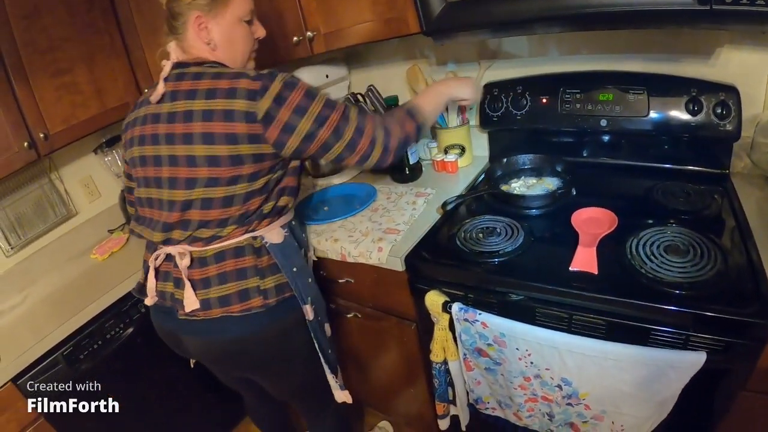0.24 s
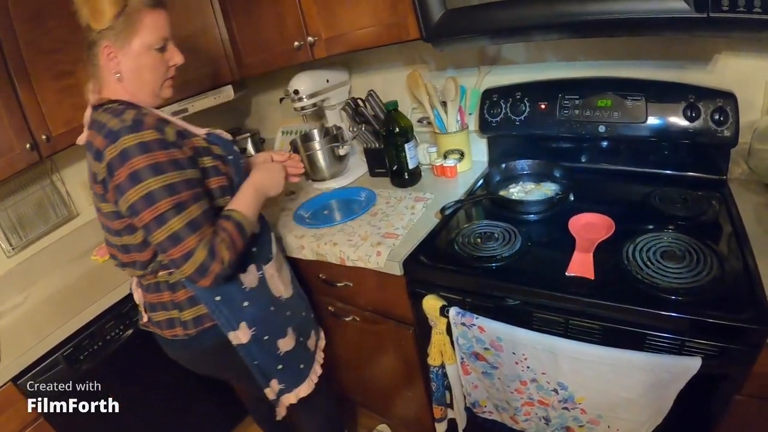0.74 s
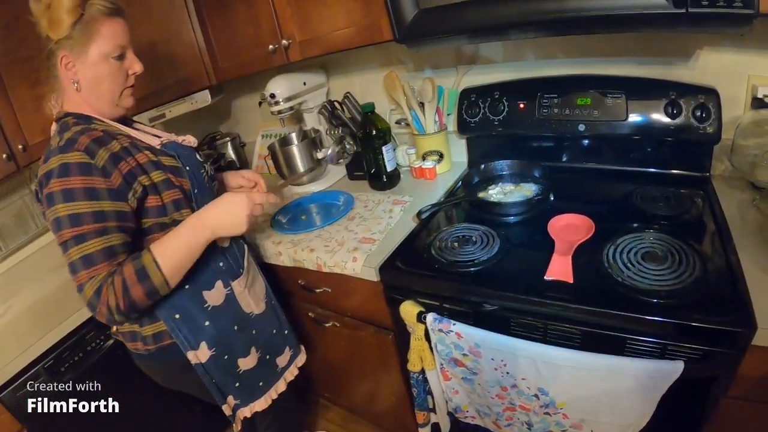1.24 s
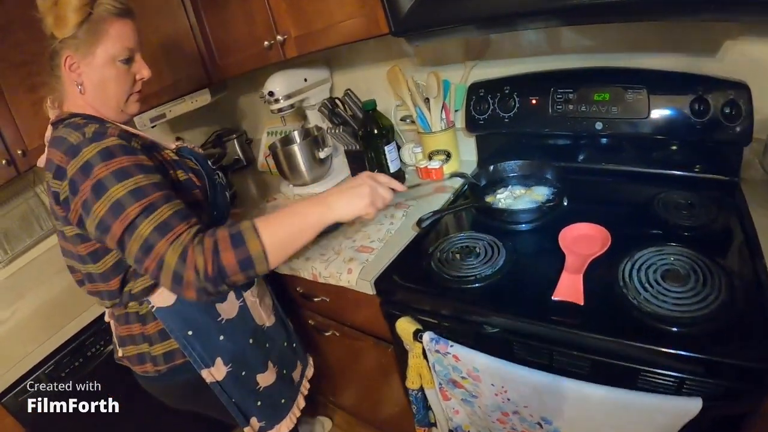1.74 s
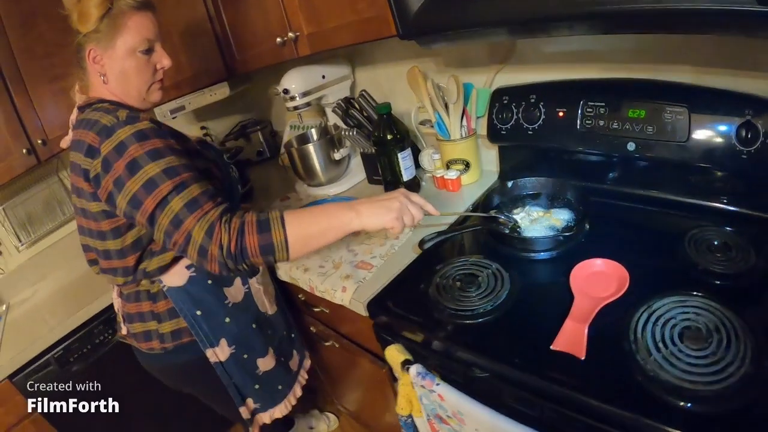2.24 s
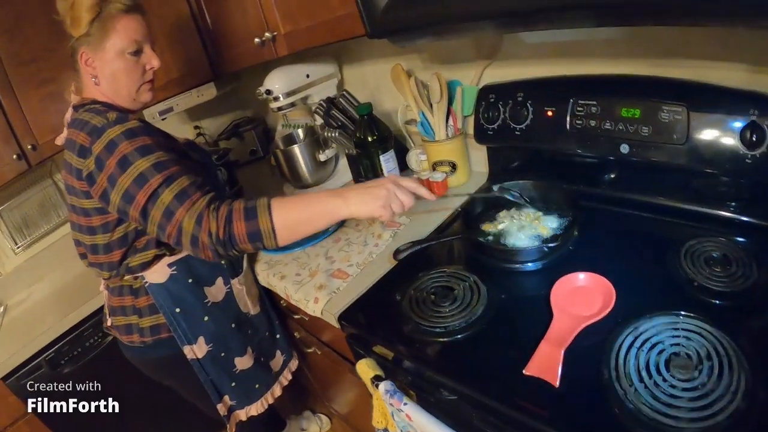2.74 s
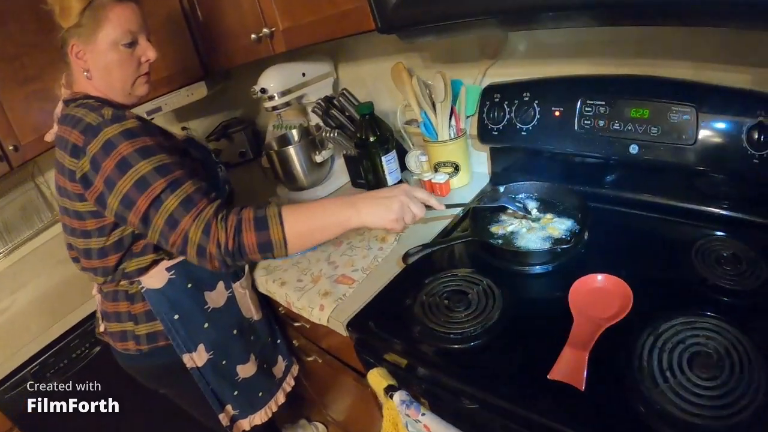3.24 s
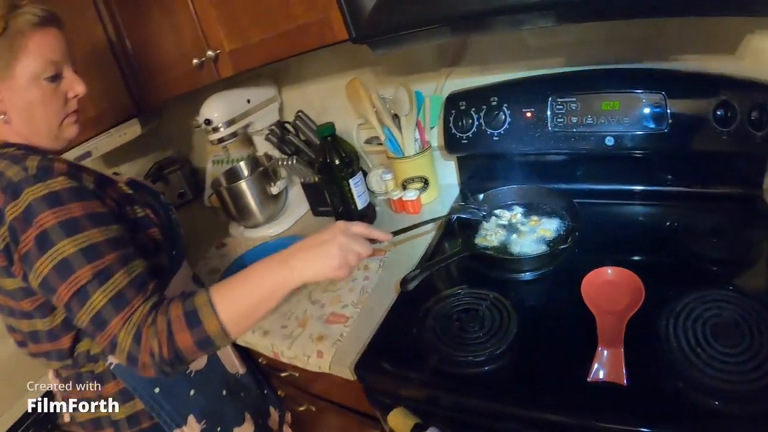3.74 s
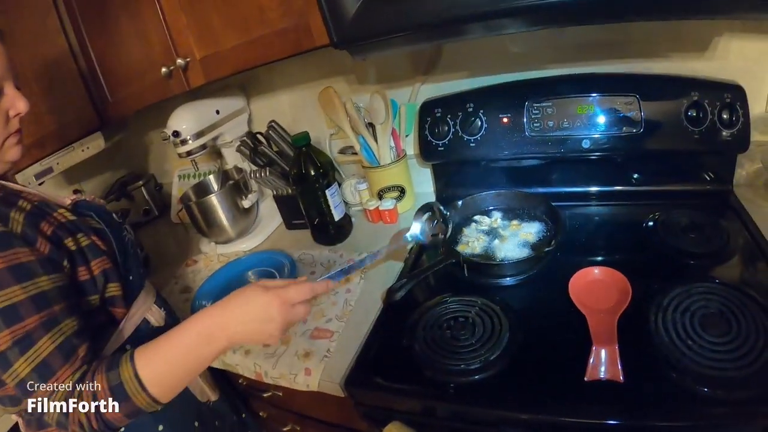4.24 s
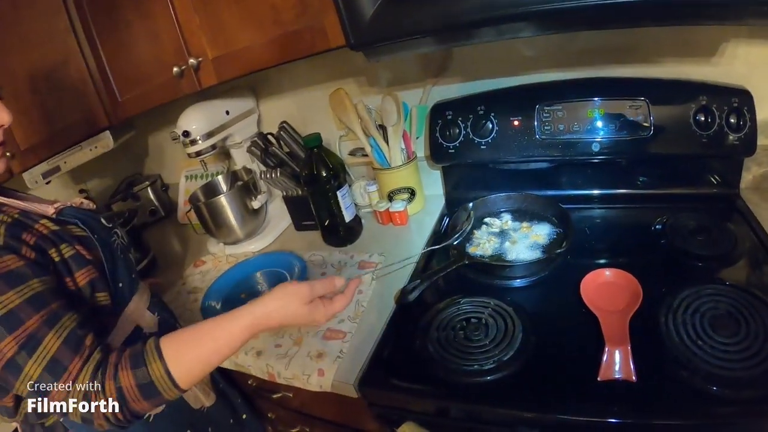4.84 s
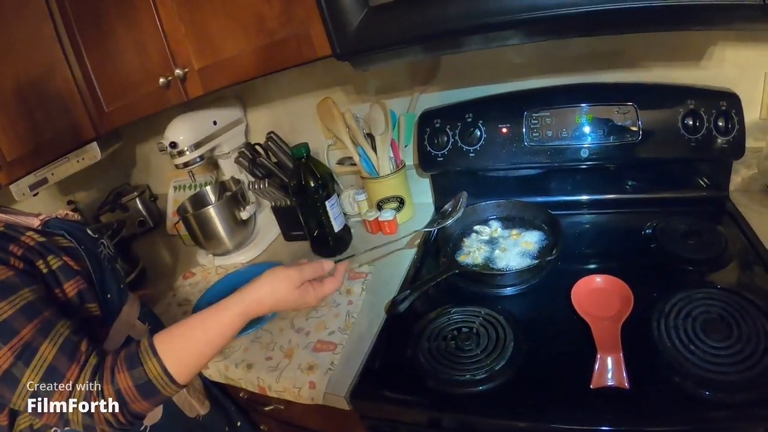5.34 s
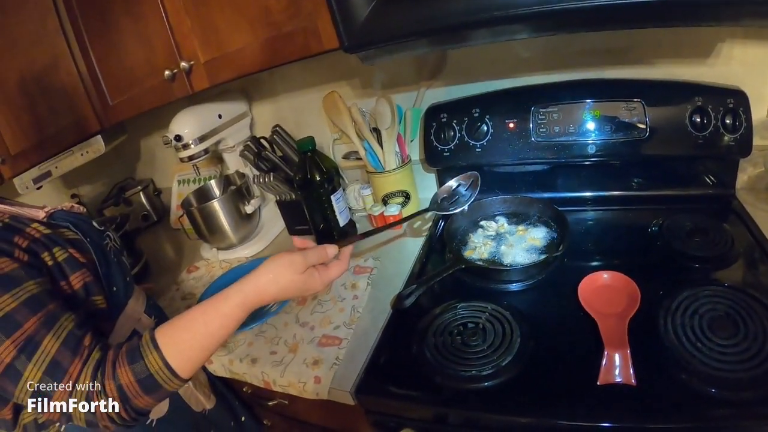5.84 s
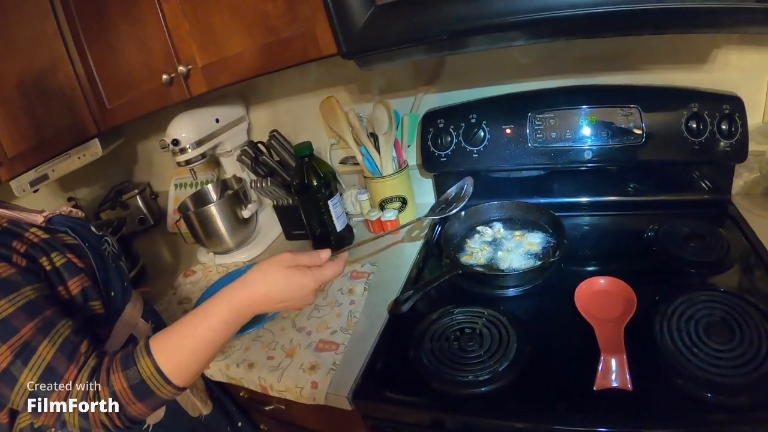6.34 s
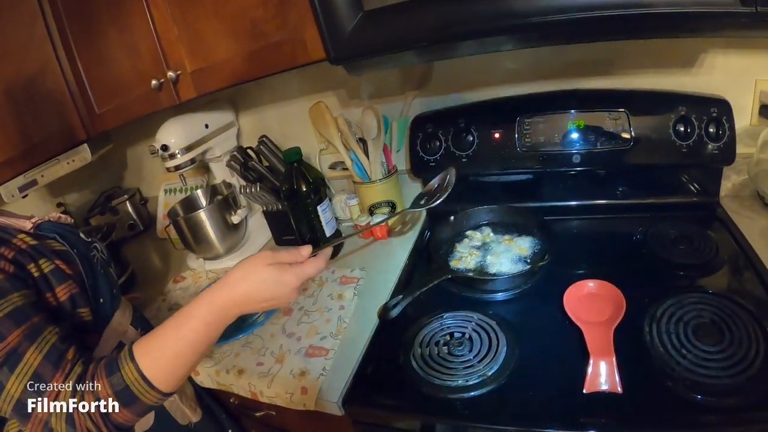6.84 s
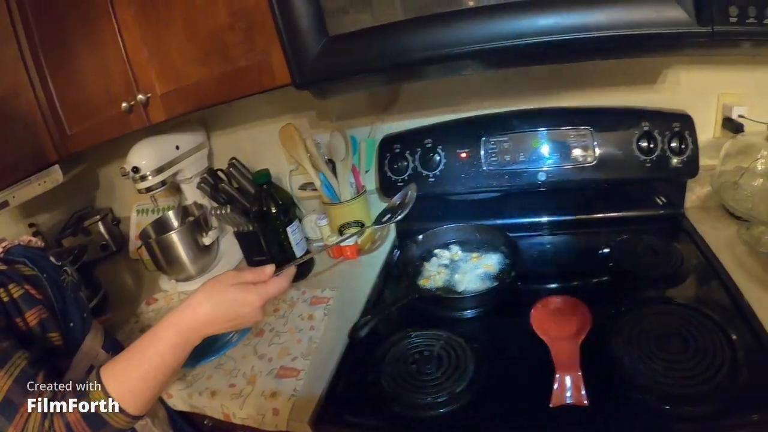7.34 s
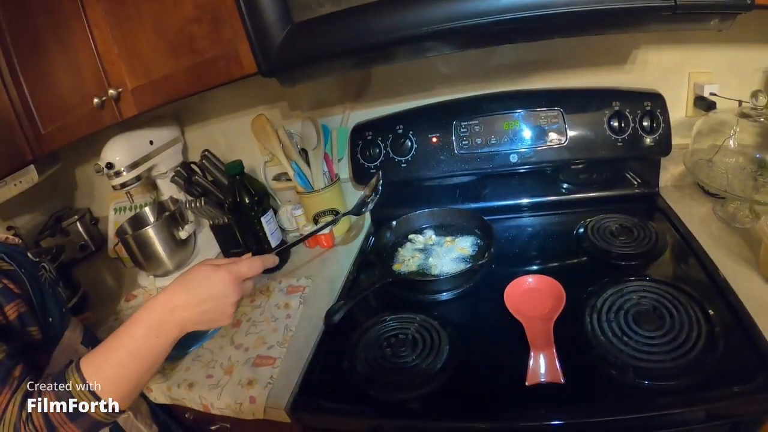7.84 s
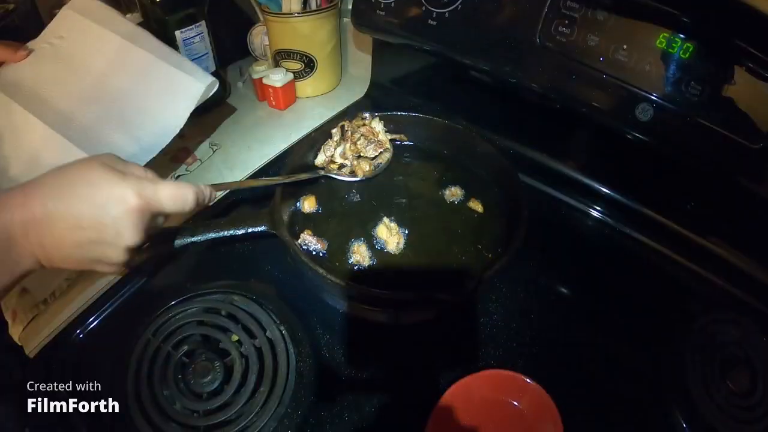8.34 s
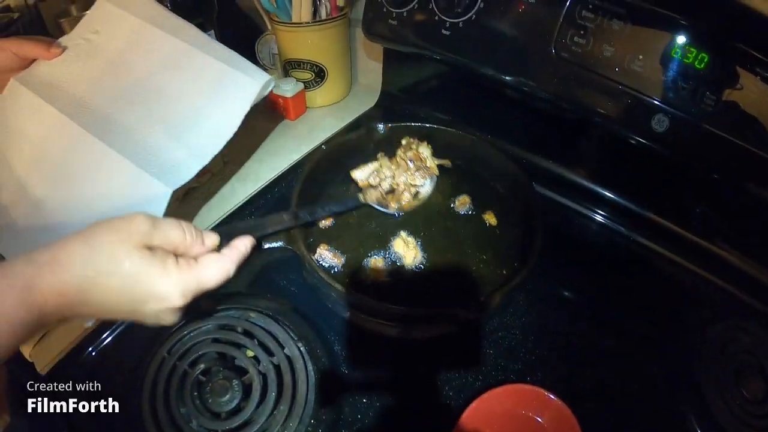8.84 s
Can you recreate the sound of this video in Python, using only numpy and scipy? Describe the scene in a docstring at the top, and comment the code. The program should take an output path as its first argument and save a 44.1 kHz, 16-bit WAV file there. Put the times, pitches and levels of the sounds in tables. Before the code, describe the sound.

Lively frying in a skillet, popping oil and utensil clacks, a deep bump, a sudden gap, then faint spoon scraping and ticks up close.

```python
"""Water boils out of meat in hot oil: filtered bubble grains sizzle, and big bubbles pop as damped sines with noise.
Utensils clack on the counter and near the pan as band-passed clicks and noise; a steel spoon also knocks and
scrapes, ringing the modes of the skillet. Low rumbling bumps follow, and the stereo sound breaks off for a moment.
Then, close up and in mono, the spoon drags, judders and ticks on the droning pan, from stick-slip grains
and short modes, while the oil only whispers in filtered noise."""
import sys
import numpy as np
from scipy import signal
from scipy.fft import rfft, irfft, next_fast_len
from scipy.io import wavfile
from scipy.ndimage import map_coordinates

SR = 44100
rng = np.random.default_rng(int(sys.argv[2]) if len(sys.argv) > 2 else 0)


def unload_wav(signal):
    """Save mono or channel-first audio to the path in sys.argv[1] as 16-bit WAV at rate SR, clipped to [-1, 1]."""
    wavfile.write(
        sys.argv[1],
        SR,
        np.round(np.clip(np.atleast_2d(signal).T, -1, 1) * 32767).astype(np.int16),
    )


N = 400869
BREAK_S, RESUME_S = 8.228, 8.46  # the frying breaks off; the close-up begins

# Spectral density of bursting bubbles: f/Hz, relative level/dB per Hz
CRACKLE_SPECTRUM = [(35, -35.5), (60, -49), (152, -13.5), (286, -12.5), (361, -8), (406, -20.5),
                    (478, -11.5), (837, -8.5), (1130, -6.5), (1370, -5), (3020, -3.5), (7150, -8.5),
                    (8620, -12), (12800, -22), (15800, -50.5)]
# Spectral density of fine spray: f/Hz, relative level/dB per Hz
FIZZ_SPECTRUM = [(3000, -10.5), (6000, -17.5), (8700, 9), (10000, -6), (12700, -3.5), (15800, -15.5)]


def amp(db):
    """Decibel law: level in dB to amplitude ratio."""
    return 10 ** (np.asarray(db) / 20)


def unit(x):
    """Normalization by mean power: scale to rms 1."""
    return x / np.sqrt(np.mean(x ** 2) + 1e-20)


def along(points, hz):
    """Logarithmic frequency scale: interpolate (f/Hz, value) points."""
    f, v = np.transpose(points)
    return np.interp(np.log(hz + 1), np.log(f + 1), v)


def curves(rows):
    """Linear interpolation in time: one value per sample for each column after t/s."""
    s, *columns = np.transpose(rows)
    return [np.interp(np.arange(N) / SR, s, column) for column in columns]


def between(start, end, fade):
    """Gating with linear ramps: 1 from start to end, all in s."""
    t = np.arange(N) / SR
    return np.clip(np.minimum(t - start, end - t) / fade + 0.5, 0, 1)


def wobble(rate):
    """Slow random modulation: a smooth curve through rate random knots a second."""
    knots = rng.standard_normal(int(N * rate / SR) + 4)
    return map_coordinates(knots, [np.arange(N) * rate / SR])


def filtered(x, response):
    """Linear filtering: multiply the spectrum by a complex response of frequency."""
    m = next_fast_len(N + SR // 2)
    return irfft(rfft(x, m) * response(np.fft.rfftfreq(m, 1 / SR)), m)[..., :N]


def coloured(x, gain_db):
    """Minimum-phase filtering: a causal response from a gain in dB, by folding the cepstrum."""
    size = 4096
    cepstrum = irfft(np.log(amp(gain_db(np.fft.rfftfreq(size, 1 / SR))) + 1e-6))
    fold = np.r_[1, np.full(size // 2 - 1, 2), 1, np.zeros(size // 2 - 1)]
    response = irfft(np.exp(rfft(cepstrum * fold)))
    return signal.oaconvolve(x, np.array(response, ndmin=x.ndim), axes=-1)[..., :N]


def shaped(x, spectrum):
    """Spectral shaping: filter by the given spectrum, then scale to rms 1."""
    return unit(coloured(x, lambda hz: along(spectrum, hz)))


def add(track, s, sound):
    """Superposition: mix a sound into a track at s seconds."""
    part = track[round(s * SR):][:len(sound)]
    part += sound[:len(part)]


def flare(attack, hold, release):
    t = np.arange(SR // 4) / SR
    return np.clip(t / attack, 0, 1) * np.exp(-np.maximum(t - hold, 0) / release)


def ringing(hz, t, rough):
    """Phase diffusion: a sine whose phase drifts, as in a mode damped by a loose contact."""
    return np.sin(2 * np.pi * hz * t + rough * np.cumsum(rng.standard_normal(len(t))))


def bubbles(count, low_hz, high_hz, cycles, spread_db):
    """Granular shot noise: short sines swell and die at random moments, many faint and a few strong."""
    when, pitch, size, life = rng.random((count, 4)).T[:, :, None]
    hz = low_hz * (min(high_hz, SR / 2) / low_hz) ** pitch
    k = np.arange(128)  # sample number within a grain
    turns = cycles * 3 ** (2 * life - 1)
    strength = amp(-spread_db * np.log(size + 0.057)) * hz / np.sqrt(turns)
    age = 2 * hz / SR / turns * k
    grains = strength * age * np.exp(-age) * np.sin(2 * np.pi * hz / SR * k)
    places = (when * N).astype(int) + k
    return unit(np.bincount(places.ravel(), grains.ravel(), minlength=N)[:N])


def sputtering():
    """Flash boiling: power of flare-ups, which hold while the juice lasts, and of short spits."""
    # Juice runs into the oil and the boil flares up: t/s, hold/s, relative level/dB
    sputters = [(0.616, 0.062, -29), (0.705, 0.14, -32.5), (1.593, 0.08, -32), (1.725, 0.049, -31),
                (2.395, 0.05, -32.5), (2.668, 0.079, -28.5), (3.488, 0.16, -34.5), (5.478, 0.043, -29),
                (6.044, 0.053, -30), (6.583, 0.048, -29.5), (6.658, 0.089, -31), (7.265, 0.12, -31.5),
                (7.761, 0.03, -26), (8.123, 0.022, -24.5)]
    # Single drops of juice flash to steam: t/s, relative level/dB
    spits = [(0.217, -30), (0.243, -27.5), (0.284, -25), (0.305, -25), (0.537, -27.5), (1.257, -28),
             (1.372, -27), (1.748, -27.5), (2.204, -23), (2.295, -25.5), (2.333, -26), (2.406, -24),
             (2.478, -25), (2.611, -22.5), (2.999, -26), (3.187, -25), (3.321, -24), (3.381, -25.5),
             (3.55, -23), (3.625, -25), (3.865, -25), (4.023, -25.5), (4.045, -26.5), (4.101, -22.5),
             (4.169, -25.5), (4.187, -25.5), (4.212, -23.5), (4.286, -21), (4.453, -26.5), (4.477, -26),
             (4.544, -27), (4.631, -25), (5.003, -24), (5.193, -25.5), (5.24, -25), (5.301, -23.5),
             (5.436, -25.5), (5.509, -28), (5.533, -23), (5.567, -29), (5.875, -25), (5.924, -22.5),
             (6.022, -26), (6.085, -25), (6.269, -23), (6.339, -23.5), (6.397, -27), (6.527, -21.5),
             (6.736, -24), (6.815, -23), (6.86, -27.5), (6.888, -25), (6.971, -25), (6.991, -26),
             (7.096, -25.5), (7.161, -26.5), (7.249, -24.5), (7.292, -25), (7.352, -23), (7.403, -24.5),
             (7.491, -23), (7.888, -23.5), (7.917, -23.5), (8.167, -27.5)]
    power = np.zeros(N)
    for s, hold, db in sputters:
        add(power, s, (amp(db) * flare(attack=0.0048, hold=hold, release=0.0059)) ** 2)
    for s, db in spits:
        add(power, s, (amp(db) * flare(attack=0.0015, hold=0.0073, release=0.004)) ** 2)
    return power


def sizzle():
    """Vapour-bubble noise: water boils out of the meat in flurries, and spray fizzes on the hot iron."""
    # How hard the oil boils: t/s, relative level/dB
    boil = [(0.0, -31), (0.76, -34), (0.93, -36), (1.2, -35), (1.7, -33.5), (1.9, -35), (2.12, -33.5),
            (2.47, -30), (2.92, -32), (3.18, -30), (4.1, -31.5), (4.68, -28.5), (4.81, -30.5),
            (5.97, -30.5), (6.15, -34.5), (6.9, -31), (7.55, -33), (8.0, -33)]
    spray_mean_db, spray_follows = -44.5, 0.82  # fizz at a mean boil; dB of fizz per dB of boil
    spray_grows_db_per_s = 0.5  # the spray thickens as the meat heats through
    steady_power = amp(curves(boil)[0] + 0.6 * wobble(14)) ** 2
    boil_db = 10 * np.log10(steady_power + sputtering())
    flurry = np.tanh(unit(wobble(60) + 1.5 * wobble(170)) / 2)

    bursts = bubbles(count=6000, low_hz=816, high_hz=14800, cycles=0.49, spread_db=5.5)
    # Rounder bubbles, each with its own pitch
    pings = bubbles(count=1100, low_hz=1400, high_hz=6060, cycles=1.23, spread_db=3.0)
    boiling = bursts * amp(3.2 * flurry) + 0.5 * pings + 0.28 * rng.standard_normal(N)
    crackle = shaped(boiling, CRACKLE_SPECTRUM)
    # Small bubbles carry little bass
    crackle = coloured(crackle, lambda hz: along([(110, -7.0), (250, -1.5), (700, 0.5)], hz))

    mist = bubbles(count=6000, low_hz=5010, high_hz=16000, cycles=0.8, spread_db=1.5)
    # Single drops of fat crack
    spatter = bubbles(count=320, low_hz=5060, high_hz=13900, cycles=0.72, spread_db=8.0)
    fizz = shaped(mist * amp(3.4 * flurry) + 0.44 * spatter, FIZZ_SPECTRUM)
    growth_db = spray_grows_db_per_s * (np.arange(N) - N / 2) / SR
    spray_db = spray_mean_db + spray_follows * (boil_db - boil_db.mean()) + growth_db
    return amp(boil_db) * crackle + amp(spray_db) * fizz


def small_pops():
    """Uniform random occurrence: lesser bubbles, in rows like those of the big ones."""
    pops_per_s = 5
    draws = rng.random((int(pops_per_s * BREAK_S), 4))
    rows = []
    for when, size, pitch, puff in draws:
        level_db = -20 + 4 * (2 * size - 1)
        hz = 3950 * 2.1 ** (2 * pitch - 1)
        puff_db = -30.5 + 9 * (2 * puff - 1)
        rows.append((when * BREAK_S, level_db, hz, puff_db))
    return rows


def pops():
    """Cavity resonance: big bubbles snap open, ring, puff steam and throw droplets; the oil sloshes back."""
    # Big steam bubbles bursting: t/s, relative level/dB, cavity f/Hz, relative level of the puff/dB
    big_pops = [(0.023, -6.5, 2900, -38), (0.161, -10, 1400, -32), (0.57, -6, 3820, -23),
                (0.732, -14, 3500, -16), (0.793, -7, 3370, -38), (0.933, -17, 4000, -14),
                (1.099, -16.5, 3760, -10), (1.373, -13.5, 7000, -25), (1.66, -16.5, 3900, -9),
                (1.841, -11.5, 4160, -26), (1.9147, -10, 3840, -20), (2.461, -9, 1290, -16),
                (2.584, -8.5, 4370, -17.5), (2.722, -11, 2010, -20), (3.487, -9, 3980, -17.5),
                (3.515, -11.5, 2300, -36), (3.523, -8, 4600, -37.5), (3.585, -17, 2600, -4),
                (3.613, -18.5, 2200, -3), (3.674, -19, 1500, -1.5), (3.748, -7.5, 3500, -29),
                (3.899, -6.5, 5000, -45), (4.074, -9, 3500, -18), (4.402, -9, 2680, -29),
                (4.685, -13.5, 4030, -11.5), (4.758, -15, 3070, -5.5), (4.8548, -8.5, 3950, -22),
                (4.888, -19.5, 1800, -9), (5.037, -9.5, 3400, -31), (5.051, -11.5, 3000, -42),
                (5.114, -8, 4200, -21), (5.161, -8.5, 2410, -24), (5.254, -13, 3400, -8),
                (5.333, -11.5, 3000, -25), (5.348, -15, 8240, -31), (5.752, -9.5, 3690, -28),
                (5.771, -17.5, 1900, -2), (5.8404, -5, 4200, -19), (5.996, -6, 3070, -33),
                (6.1063, -6.5, 2090, -22), (6.288, -9.5, 1920, -33), (6.366, -15, 3020, -6.5),
                (6.447, -6.5, 2700, -37), (6.66, -10.5, 4150, -12.5), (6.714, -20.5, 4200, -3),
                (6.906, -10.5, 2690, -33), (7.317, -9.5, 3300, -13), (7.643, -6.5, 5140, -23),
                (7.818, -10.5, 2900, -23.5), (7.982, -11.5, 4200, -39.5), (8.0378, -8.5, 2680, -37.5),
                (8.07, -7.5, 2700, -23), (8.196, -13, 8000, -43)]
    # Spectral density of oil falling back: f/Hz, relative level/dB per Hz
    slosh_spectrum = [(100, -28.5), (400, -7.5), (800, -4), (2000, 10.5), (4000, -10), (9000, -32.5)]
    middle_hz = 3000
    tear_s, cavity_s, droplets_s, slosh_s = 0.000055, 0.0038, 0.013, 0.024  # click length; then decays
    track, spit, crack, slosh = np.zeros((4, N))
    t = np.arange(SR // 6) / SR
    for s, db, hz, puff_db in big_pops + small_pops():
        smallness = hz / middle_hz
        snap = np.exp(-hz * t / 2.16) * np.sin(2 * np.pi * hz * t)
        u = t / 0.00017
        puff = (1 - u) * np.exp(-u) * (1 - np.exp(-t / 0.00005))
        # The film of the bubble tears: one sharp click
        tear = np.diff(t / tear_s * np.exp(1 - t / tear_s), prepend=0)
        add(track, s + 0.001014, amp(db) * (snap + amp(-13) * tear + amp(puff_db + 24.0) * puff))
        cavity = np.exp(-t / cavity_s) * ringing(hz, t, rough=0.25)
        add(track, s + 0.001506, amp(db - 13.5) * cavity)
        # Smaller, higher bubbles crack harder: 9.5 dB per octave
        add(crack, s + 0.001, amp(db - 13 + 9.5 * np.log2(smallness)) * np.exp(-t / 0.00083))
        burst = amp(db - 20) * np.exp(-t / 0.0059)
        add(spit, s + 0.0011, burst + amp(db - 27) * np.exp(-t / droplets_s))
        # Big, low bubbles leave the most slosh
        add(slosh, s + 0.0071, amp(db - 26) / (1 + smallness ** 4) * np.exp(-t / slosh_s))
    droplets = bubbles(count=4000, low_hz=1000, high_hz=14800, cycles=0.56, spread_db=1.0)
    droplets = droplets + 1.4 * rng.standard_normal(N)
    hiss = spit * shaped(droplets, CRACKLE_SPECTRUM)
    bright = crack * shaped(droplets, FIZZ_SPECTRUM)
    return track + hiss + bright + slosh * shaped(droplets, slosh_spectrum)


def clacks():
    """Band-limited impact: utensils give a hard click and a short dry body; the cupboards answer."""
    # Utensils clack on the counter or near the pan: t/s, relative level/dB, lowest f/Hz, highest f/Hz
    blows = [(0.8239, -9, 536, 1830), (1.099, -12.5, 377, 2070), (1.28, -7, 830, 3120),
             (4.0745, -14.5, 545, 2000)]
    blow_s, cupboards_s = 0.0026, 0.053  # decays
    track, t = np.zeros(N), np.arange(SR // 4) / SR
    for s, db, low_hz, high_hz in blows:
        band = signal.butter(2, [low_hz, min(high_hz, SR / 2 - 1)], "bandpass", fs=SR)
        click = signal.lfilter(*band, t == 0)
        body = unit(signal.lfilter(*band, rng.standard_normal(len(t))))
        dying = amp(-6.5) * np.exp(-t / blow_s) + amp(-22) * np.exp(-t / cupboards_s)
        add(track, s, amp(db) * (click / np.abs(click).max() + dying * body))
    response = echoes(near_db=-9.0, near_t60=0.02, room_db=-2.0)
    return signal.oaconvolve(track[None], response, axes=1)[:, :N]


def skillet(x, pitch=1):
    """Modal superposition: the pan rings in damped modes, all shifted by the factor pitch."""
    # Modes of the pan: f/Hz, width/Hz, relative level/dB
    modes = [(174, 9.3, 0), (392, 11, -3.5), (444, 18, 3), (738, 32, 12.5), (815, 50, 5), (1148, 31, 5.5),
             (1245, 45, 6.5), (1320, 41, -10), (1860, 21, -11.5), (1914, 52, -2.5), (2200, 36, -9),
             (2570, 98, -24.5)]

    def response(f):
        total = 0
        for k, (centre, width, db) in enumerate(modes):
            damping = 1j * f * width
            total = total + (-1) ** k * amp(db) * damping / ((pitch * centre) ** 2 - f * f + damping)
        return total

    return filtered(x, response)


def scraping(ring_db, grit_db, pitch=1):
    """Stick-slip friction: steel on iron makes rough little jolts that ring the pan."""
    # Spectral density of the grit: f/Hz, relative level/dB per Hz
    grit_spectrum = [(150, -17.5), (400, -11.5), (750, -5), (1250, 1.5), (2100, 0.5), (4000, -11),
                     (9000, -38), (13000, -60)]
    slips = bubbles(count=4000, low_hz=493, high_hz=8970, cycles=0.43, spread_db=3.0)
    slips = slips + 0.89 * rng.standard_normal(N)
    slips = slips * amp(1.2 * wobble(90))
    ring_colour = [(150, -2.5), (450, -17.0), (700, -4), (1200, 1), (3000, 5.5)]
    ring = shaped(skillet(slips, pitch), ring_colour)
    return amp(ring_db) * ring + amp(grit_db) * shaped(slips, grit_spectrum)


def stirring():
    """Impact and friction excitation: the spoon knocks on the pan and pushes the meat around."""
    # Strokes of the spoon over the pan, one list each: t/s, relative level/dB
    strokes = [
        [(2.243, -22), (2.276, -27.5), (2.35, -29.5)],
        [(2.465, -26.5), (2.512, -25)],
        [(3.028, -24), (3.105, -33.5), (3.2, -29.5)],
    ]
    # Knocks: t/s, relative level/dB, contact f/Hz, decay/s, relative level of the pan's rocking/dB
    knocks = [(2.259, -20.5, 765, 0.015, -29), (2.264, -17.5, 1290, .018, -20),
              (2.294, -23.5, 1250, .012, -8.5), (3.011, -25.5, 522, .008, -25),
              (3.033, -26, 794, .026, -25), (3.075, -28.5, 757, 0.034, -34.5),
              (3.127, -24, 1190, 0.01, -18), (3.4262, -13.5, 738, 0.014, -46)]
    stroke = sum(amp(curves(rows)[0]) * between(rows[0][0], rows[-1][0], 0.023) for rows in strokes)
    blows, jolts, clack = np.zeros((3, N))
    t = np.arange(SR // 8) / SR
    for s, db, hz, decay, rock_db in knocks:
        add(blows, s, amp(db - 2) * np.exp(-t / decay) * ringing(hz, t, rough=0.008))
        add(clack, s, amp(db - 9.5) * np.exp(-t / 0.011))
        add(jolts, s, amp(db + rock_db + 19.5) * np.exp(-t / 0.0028))  # the shove rocks the whole pan
    clack_colour = [(200, -24.5), (700, -3.5), (3500, 2.5), (9000, -17.5), (15000, -39.0)]
    clatter = clack * shaped(rng.standard_normal(N), clack_colour)
    return stroke * scraping(ring_db=-6.5, grit_db=-4.5) + blows + skillet(jolts) + clatter


def bumping():
    """Low-pass noise under an envelope: brief deep bumps swell and fade."""
    # Course of the rumble: t/s, relative level/dB
    bumps = [(7.7, -69), (7.9, -59), (7.946, -45), (8.02, -46), (8.09, -52), (8.152, -25), (8.22, -42)]
    # Spectral density of the rumble: f/Hz, relative level/dB per Hz
    rumble_spectrum = [(10, 11), (25, 10), (45, 0), (80, -28), (200, -41.5)]
    rumble = shaped(rng.standard_normal(N), rumble_spectrum)
    return amp(curves(bumps)[0]) * between(7.7, BREAK_S, 0.019) * rumble


def scooping():
    """Friction-driven modes: the spoon drags and judders; the pan drones under its weight; its edge ticks."""
    # Course of the drags: t/s, relative scrape level/dB, relative level of the pan's drone/dB
    scoop = [(8.46, -60, -60), (8.5, -40, -43), (8.54, -46, -41), (8.567, -40, -43), (8.594, -33, -37),
             (8.66, -52, -46), (8.725, -51, -57), (8.775, -39.5, -51.5), (8.85, -38, -56),
             (8.925, -34.5, -65), (8.965, -48.5, -52), (9.09, -73, -74)]
    # The dragged spoon catches and lets go: t/s, relative level/dB
    judders = [(8.799, -38), (8.826, -35), (8.86, -32), (8.895, -31.5), (8.907, -31)]
    # Light ticks of the spoon's edge: t/s, relative level/dB, f/Hz, t60/s
    edge_ticks = [(8.511, -15, 8600, 0.011), (8.521, -23, 5500, 0.0085), (8.763, -23, 7200, 0.01),
                  (8.7984, -26, 5400, 0.029), (8.838, -17, 5200, 0.044), (8.941, -23, 2630, 0.027),
                  (8.99, -23.5, 3700, 0.0079)]
    # The spoon eases off between its two drags, and the pan rings lower
    ease_s, pressed_pitch, eased_pitch = 8.69, 1.035, 0.99
    scrape_db, drone_db = curves(scoop)
    power = amp(scrape_db) ** 2
    for s, db in judders:
        add(power, s, (amp(db) * flare(attack=0.002, hold=0.006, release=0.008)) ** 2)
    pressed = scraping(ring_db=1.0, grit_db=-3.0, pitch=pressed_pitch)
    eased = scraping(ring_db=1.0, grit_db=-3.0, pitch=eased_pitch)
    share = between(0, ease_s, 0.03)
    drag = np.sqrt(power) * (share * pressed + (1 - share) * eased)

    drone_colour = [(100, 1.0), (480, -2.0), (700, -26.0), (2000, -59.0)]
    drone = shaped(skillet(rng.standard_normal(N)), drone_colour)

    ticks, t = np.zeros(N), np.arange(SR // 10) / SR
    for s, db, hz, t60 in edge_ticks:
        ring = amp(-60 * t / t60) * ringing(hz, t, rough=0.13)
        crack = amp(-60 * t / 0.027) * rng.standard_normal(len(t))
        add(ticks, s + 0.00081, amp(db - 11.0) * (ring + 0.88 * crack))
    tick_colour = [(700, -13), (2500, 5.5), (9000, 1.5), (11500, -23)]
    ticks = coloured(ticks, lambda hz: along(tick_colour, hz))
    return drag + amp(drone_db) * drone + ticks


def whisper():
    """Sparse shot noise over broadband noise: a few scraps simmer over the hush of the kitchen."""
    # Spectral density of simmer and hush: f/Hz, relative level/dB per Hz
    whisper_spectrum = [(24, -27.5), (40, -3), (82, -16), (125, -20), (329, -19), (382, -11), (845, -11.5),
                        (1960, -3), (5850, -11), (9130, -12.5), (15000, -50)]
    simmer = bubbles(count=3000, low_hz=2020, high_hz=12300, cycles=0.65, spread_db=7.0)
    return amp(-44.5) * shaped(0.43 * simmer + rng.standard_normal(N), whisper_spectrum)


def echoes(near_db, near_t60, room_db):
    """Exponential reverberation: direct sound, quick echoes off pan and stove back, then the kitchen."""
    # Reverberation time of the kitchen: f/Hz, t60/s
    room_decay = [(150, 0.46), (1000, 0.33), (4000, 0.41), (14000, 0.36)]
    # Left-right likeness of the echoes: f/Hz, correlation
    likeness = [(150, 0.7), (600, 0.8), (1500, 0.7), (4000, 0.41), (9000, 0.54), (14000, 0.11)]
    hz, t, z = signal.stft(rng.standard_normal((2, SR // 4)), SR, nperseg=128)
    turn = np.arccos(np.clip(along(likeness, hz), -1, 1))[:, None] / 2
    mid, side = z[0] * np.cos(turn), z[1] * np.sin(turn)
    pair = np.array([mid + side, mid - side])
    room_t60 = along(room_decay, hz)[:, None]
    response = 0
    for db, t60 in ((near_db, near_t60), (room_db, room_t60)):
        tail = signal.istft(pair * amp(-60 * t / t60), SR, nperseg=128)[1]
        response = response + amp(db) * tail / np.linalg.norm(tail[0])
    norm = np.sqrt(1 + np.sum(response[0] ** 2))
    return np.hstack([np.ones((2, 1)), np.zeros((2, 20)), response]) / norm


def kitchen(x, direct, count=10):
    """Convolution and interaural cues: sound leaps among spots with their own echoes, a little to the right."""
    # Stereo balance: f/Hz, left minus right/dB
    balance = [(200, 0), (500, -2), (2400, 0), (4500, -1), (8500, -1.5), (12500, -6), (15800, -4)]
    lag_s = 4.2e-5  # left after right
    spot = np.cumsum(90 * amp(3 * wobble(30))) / SR % count
    out = np.array([direct, direct])
    for k in range(count):
        distance = np.abs((spot - k + count / 2) % count - count / 2)
        share = np.clip(1.5 - 2 * distance, 0, 1)
        response = echoes(near_db=-1.5, near_t60=0.021, room_db=1.0)
        out += signal.oaconvolve((share * x)[None], response, axes=1)[:, :N]
    half = np.array([[0.5], [-0.5]])
    return filtered(out, lambda hz: amp(half * along(balance, hz)) * np.exp(-2j * np.pi * hz * half * lag_s))


def stove(x, low_hz):
    """Resonant colouring: pan and stove top tint the sound; so small a source sends out no deep bass."""
    # Colour of pan and stove top: f/Hz, width/Hz, gain/dB
    resonances = [(163, 96, 8), (310, 56, -7), (476.6, 34, 6.5), (738, 26, 2), (980, 43, 6),
                  (1142, 120, 7.5), (3020, 69, 2), (3770, 2170, 4.5)]

    def gain_db(hz):
        bumps_db = sum(db / (1 + (2 * (hz - c) / w) ** 2) for c, w, db in resonances)
        return bumps_db - 10 * np.log10(1 + (low_hz / (hz + 10)) ** 5)

    return coloured(x, gain_db)


def scene():
    """Superposition: the frying in stereo, a short break, then the close-up in mono."""
    sharp = amp(-4.0) * pops()
    pan = amp(-1.22) * sizzle() + stirring() + sharp
    # Pops sound above the rim, so more of them arrives directly
    frying = stove(kitchen(pan, direct=amp(-12) * sharp), low_hz=90)
    wide = frying + amp(0.4) * clacks() + bumping()
    close = scooping() + whisper()
    return wide * between(-1, BREAK_S, 0.018) + close * between(RESUME_S + 0.024, 10, 0.076)


def record(dry):
    """Band limitation: a steep low-pass at 15.8 kHz."""
    return filtered(dry, lambda hz: 1 / (1 + (hz / 15800) ** 120))


dry = scene()
out = record(dry)
unload_wav(out)
```